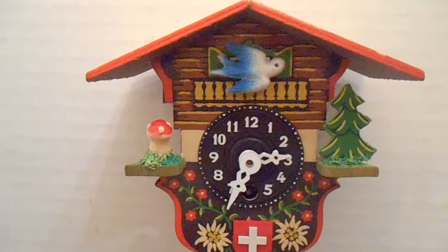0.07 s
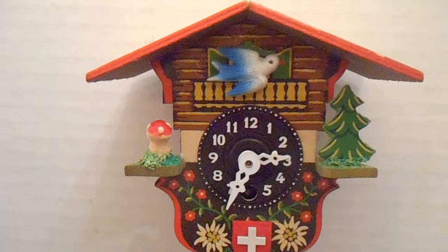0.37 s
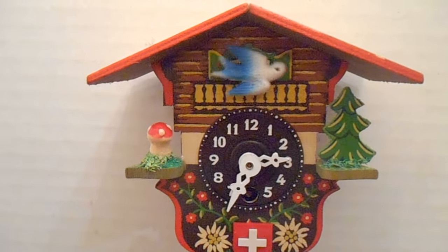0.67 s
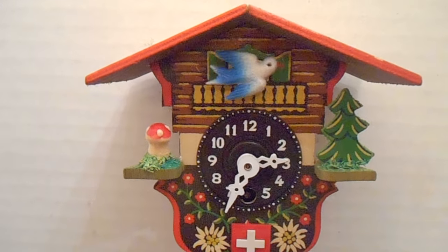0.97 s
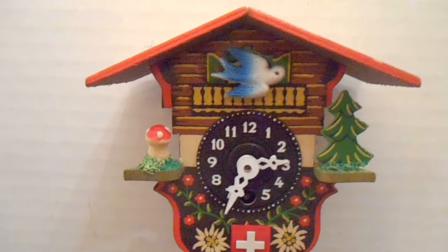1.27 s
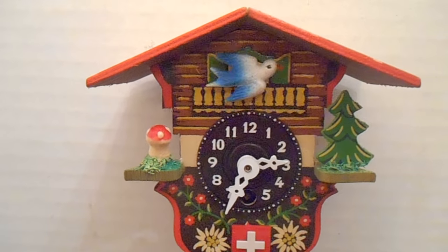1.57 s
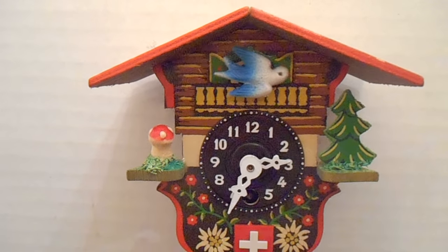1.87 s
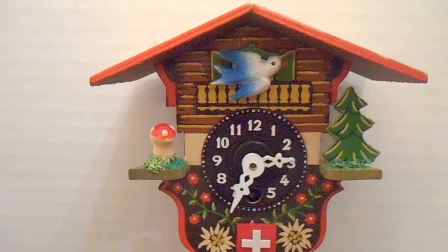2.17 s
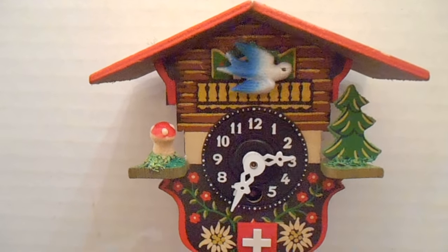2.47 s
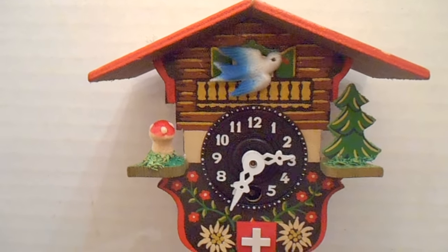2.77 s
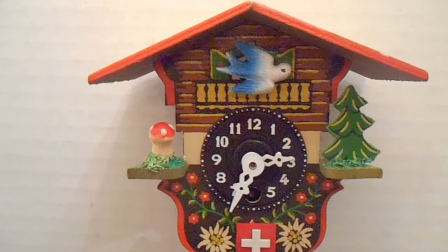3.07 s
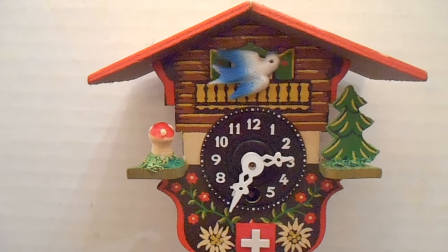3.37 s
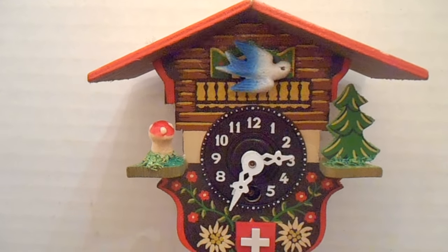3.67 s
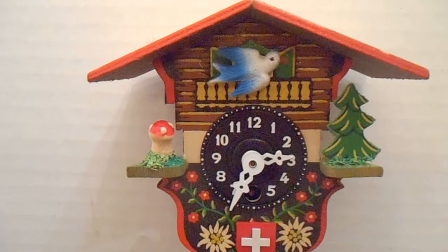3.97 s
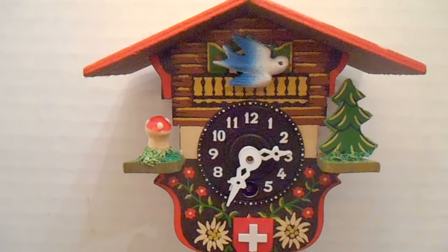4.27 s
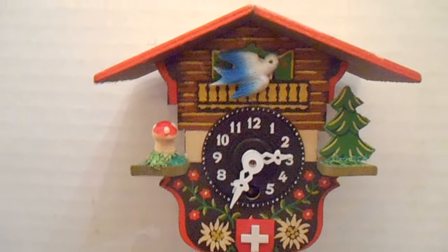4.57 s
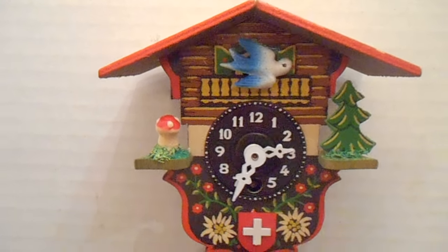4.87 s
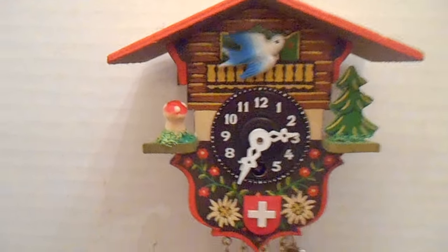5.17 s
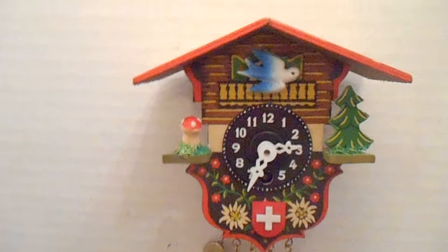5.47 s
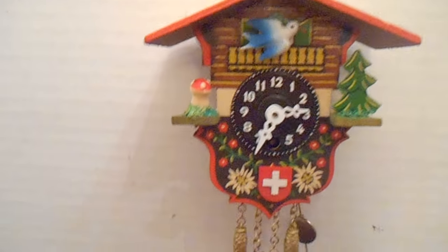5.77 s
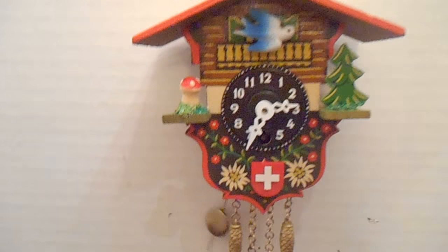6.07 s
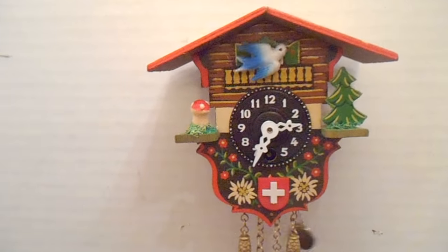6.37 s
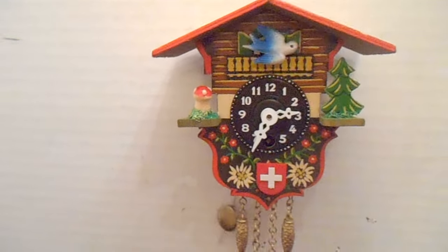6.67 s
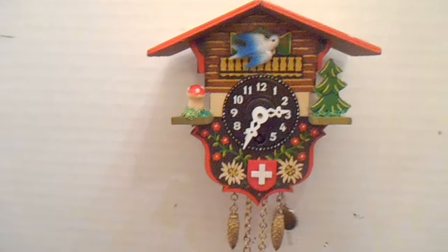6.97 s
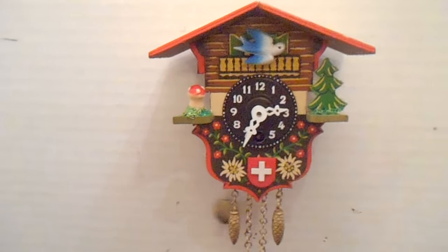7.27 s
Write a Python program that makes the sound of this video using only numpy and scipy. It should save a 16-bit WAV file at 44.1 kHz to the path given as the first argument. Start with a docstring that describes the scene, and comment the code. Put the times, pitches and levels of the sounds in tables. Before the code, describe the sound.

A miniature wooden wall clock ticks close to the microphone, about three and a half beats a second, in a slightly lopsided tick-tock. Each beat is a short, bright, metallic click with a little room reflection. A faint ventilation hum and hiss lie underneath. Past the middle, fingers shift on the hand-held camera, adding a few dry plastic clicks, then tiny creaks and soft rubs while the ticking carries on.

```python
"""Miniature cuckoo clock, close up

A small wooden clock ticks on the wall of a quiet room, over a murmur of ventilation. A tooth of the
escape wheel slides along one pallet and the wheel drops on the other: tick and tock ring the same brass
movement and case. Later, fingers shift on a hand-held camera, and its body clicks, creaks and rubs."""
import sys
import numpy as np
from scipy import signal
from scipy.fft import rfft, irfft, next_fast_len
from scipy.io import wavfile
from scipy.ndimage import uniform_filter1d

SR = 44100
rng = np.random.default_rng(int(sys.argv[2]) if len(sys.argv) > 2 else 0)


def generate_wav(signal):
    """Clip the signal to [-1, 1] and save it as 16-bit WAV at the path in sys.argv[1]."""
    frames = np.transpose(np.atleast_2d(signal))
    scaled = np.clip(frames, -1, 1) * 32767
    pcm = np.round(scaled).astype(np.int16)
    wavfile.write(sys.argv[1], SR, pcm)


N = 332073


def amp(db):
    """Decibels to gain."""
    return 10 ** (np.asarray(db) / 20)


def unit(x):
    """Scales to rms 1."""
    return x / np.sqrt(np.mean(x ** 2) + 1e-20)


def curve_at(points, hz):
    """Reads rows of (frequency, value) on a log-frequency axis."""
    freqs, values = np.transpose(points)
    return np.interp(np.log(hz + 1), np.log(freqs + 1), values)


def add(mix, start, sound):
    """Mixes a sound in at a start time in seconds."""
    part = mix[max(round(start * SR), 0):][:len(sound)]
    part += sound[:len(part)]


def noise(spectrum, size):
    """Noise of rms 1 with the given spectrum."""
    gain = amp(curve_at(spectrum, np.fft.rfftfreq(size, 1 / SR)))
    return unit(irfft(rfft(rng.standard_normal(size)) * gain, size))


def band(hz, width_hz, size):
    """Noise of rms 1 in one resonance."""
    offset = 2 * (np.fft.rfftfreq(size, 1 / SR) - hz) / width_hz
    return unit(irfft(rfft(rng.standard_normal(size)) / (1 + offset ** 2), size))


def ring(t, t60, rise):
    """Envelope of a struck part: it swells as the blow spreads, then dies away."""
    return (1 - np.exp(-(t / rise) ** 2)) * amp(-60 * t / t60)


# Tones in the ventilation's hum: (frequency [Hz], width [Hz], level [dB])
VENT_TONES = [(56.7, 0.92, -77.5), (176.7, 2.03, -70.5), (188, 3.06, -67.5), (241.2, 1.62, -67),
              (254.3, 5.4, -74), (287, 4.1, -81.5), (318, 5, -83), (353.5, 4.3, -80), (394, 3.97, -76.5),
              (617.4, 18.5, -70.5), (1164, 64.7, -69)]
def vent_drone(swell_db=1.8, fastest_swell_hz=3):
    """Ventilation hums: each tone wanders in phase, and all swell slowly together."""
    t = np.arange(N) / SR
    rates = np.geomspace(fastest_swell_hz / 10, fastest_swell_hz, 12)
    wobble = unit(sum(np.sin(2 * np.pi * (hz * t + rng.random())) for hz in rates))
    hum = np.zeros(N)
    for hz, width_hz, db in VENT_TONES:
        wander = np.cumsum(rng.standard_normal(N)) * np.sqrt(2 * np.pi * width_hz / SR)
        hum += amp(db) * np.sqrt(2) * np.sin(2 * np.pi * hz * t + wander)
    return unit(amp(swell_db * wobble)) * hum


# Airy hiss of the room: (frequency [Hz], relative level [dB])
AIR_SPECTRUM = [(180, -16), (300, -4), (440, -7.5), (620, -6), (760, -4), (1300, -2), (2000, -3.5),
                (2350, -7.5), (3200, -8.5), (4700, -14), (6200, -14.5), (10000, -20.5), (11800, -20.5),
                (12600, -41)]
# Low end of the ventilation: (frequency [Hz], relative level [dB])
RUMBLE_SPECTRUM = [(8, 1), (28, 2), (48, -14), (76, -1), (108, -13), (128, 3), (160, -7.5), (210, 2),
                   (280, -7.5), (400, -23), (700, -28)]
def room_tone(air_db=-53.87, rumble_db=-63):
    """A steady bed of ventilation rumble under an even hiss."""
    return amp(air_db) * noise(AIR_SPECTRUM, N) + amp(rumble_db) * noise(RUMBLE_SPECTRUM, N)


def tooth_slide(length_s=0.0042, swell_db=7):
    """The tooth scrapes over the pallet's face, gathering speed just before it falls."""
    size = round(length_s * SR)
    spectrum = [(1200, -16), (2300, 4), (3000, 14), (5200, 5), (7500, -17), (9200, -24), (12000, -12)]
    swell = amp(swell_db * np.linspace(-.5, .5, size))
    return noise(spectrum, size) * swell * signal.windows.tukey(size, .3)


# Drifting tone of the ticks:
# (frequency [Hz], swing [dB], swing phase [cycles], beat-to-beat scatter [dB])
TICK_COLOUR = [(2384, 0.35, 0.47, 1), (3020, 1.5, 0.43, 1.45), (3300, -1.5, 0.45, 0.5),
               (4010, 4.5, 0.6, 0.5), (5040, 2, 0.25, 1), (6470, 1.9, 0.75, 1.2), (9000, 1, 0.16, 0.5)]
def tick_colour(start, cycle_s=7.4):
    """One beat's EQ curve: the ticks' tone drifts slowly and varies a little from beat to beat."""
    hz, swing_db, phase, scatter_db = np.transpose(TICK_COLOUR)
    drift_db = swing_db * np.cos(2 * np.pi * (start / cycle_s - phase))
    return np.c_[hz, drift_db + scatter_db * rng.standard_normal(len(hz))]


# Modes of case and movement: (frequency [Hz], t60 [s], relative tick level [dB], relative tock level [dB])
CLOCK_MODES = [(623, 0.048, -50.5, -50.5), (980, 0.032, -43.5, -43.5), (1168, 0.088, -51, -44.5),
               (1386, 0.026, -40.5, -79), (1697, 0.035, -39, -54), (2018, 0.05, -56, -41.5),
               (2290, 0.036, -27.5, -31.5), (2400, 0.027, -27, -26), (3016, 0.065, -31, -36.5),
               (3307, 0.028, -35, -30.5), (3630, 0.036, -36, -39.5), (3940, 0.026, -32, -30.5),
               (4140, 0.021, -39, -32), (4320, 0.049, -42, -47), (4890, 0.037, -39, -31.5),
               (4977, 0.03, -32, -31), (5216, 0.032, -32.5, -34), (5680, 0.028, -32, -32),
               (5775, 0.03, -30.5, -35), (6265, 0.012, -28, -22.5), (6740, 0.014, -33, -40),
               (7000, 0.015, -40, -33), (7300, 0.018, -39.5, -32.5), (8685, 0.016, -27, -28),
               (9064, 0.014, -14.5, -16.5), (9390, 0.017, -25, -30), (9810, 0.0088, -22, -21),
               (11620, 0.0077, -27, -34)]
# Dense, quickly damped ring of the small parts: (frequency [Hz], relative level [dB])
CLATTER_SPECTRUM = [(300, -33), (1000, -24.5), (2000, -1), (2700, -13.5), (3400, 4.5), (4000, -5.5),
                    (4600, 3), (6500, 3.5), (8200, 1.5), (9300, -9), (10400, 1), (11200, -2.5), (12200, 2)]
def tooth_drop(pallet, colour, rise_cycles=2.4, detune=0.0037, phase_scatter=0.55, noise_rise_s=0.00021):
    """A tooth hits pallet 0 or 1: the metal answers first, the wood later, and loose parts rattle on."""
    t = np.arange(SR // 6) / SR
    hz, t60, tick_db, tock_db = np.transpose(CLOCK_MODES)[:, :, None]
    gain = amp((tick_db, tock_db)[pallet] + curve_at(colour, hz))
    slip, drift = rng.standard_normal((2, len(hz), 1))  # no two teeth land on quite the same spot
    waves = np.sin(2 * np.pi * hz * (1 + detune * drift) * t + phase_scatter * slip)
    polarity = (-1) ** np.arange(len(hz))[:, None]  # neighbouring modes push the air in opposite senses
    tones = (polarity * gain * ring(t, t60, rise_cycles / hz) * waves).sum(0)
    clatter = amp(-26) * ring(t, t60=0.023, rise=noise_rise_s)
    rattle = amp(-46) * ring(t, t60=0.18, rise=noise_rise_s)
    return tones + (clatter + rattle) * noise(CLATTER_SPECTRUM, len(t))


def rebound(strike, bounce_db=-14, delay_range_s=(0.0015, 0.003)):
    """The wheel recoils and touches the pallet once more, after a slightly different gap each time."""
    delay = round(rng.uniform(*delay_range_s) * SR)
    return strike + amp(bounce_db) * np.r_[np.zeros(delay), strike][:len(strike)]


# Beats of the escapement, tick and tock in turn: (time [s], accent [dB])
BEAT_CUES = [(0.1598, 2), (0.4276, 0), (0.7413, 2.1), (1.0109, -1), (1.3267, 3), (1.5952, 1.5),
             (1.9099, 1.5), (2.1831, -0.5), (2.4944, 1.5), (2.7618, -0.5), (3.0838, 1), (3.3588, -0.4),
             (3.6702, 0.5), (3.9419, -0.5), (4.2578, 1), (4.5342, 0.2), (4.8442, 0), (5.1136, -0.6),
             (5.4315, 0), (5.7046, -1.5), (6.0185, -0.4), (6.2832, -0.5), (6.6034, 1), (6.8707, -1.8),
             (7.1871, -0.3), (7.4528, -2.5)]
def escapement(tick_gain_db=1.6, tock_gain_db=1.25, slide_db=-49, slide_spread_db=5):
    """Each swing of the pendulum frees a tooth: a tiny scrape runs straight into the drop."""
    out = np.zeros(N)
    for k, (start, accent_db) in enumerate(BEAT_CUES):
        pallet = k % 2
        scrape = amp(slide_db + slide_spread_db * rng.uniform(-0.89, 1)) * tooth_slide()
        add(out, start - len(scrape) / SR, scrape)
        strike = rebound(tooth_drop(pallet, tick_colour(start)))
        add(out, start, amp(accent_db + (tick_gain_db, tock_gain_db)[pallet]) * strike)
    return out


# The room's reverb tail: (frequency [Hz], level [dB], t60 [s])
REVERB_BANDS = [(500, 3, 0.11), (1220, -4, 0.089), (2330, -19, 0.43), (2950, -20.5, 0.28),
                (3470, -14.5, 0.41), (4300, -25, 0.25), (5440, -12.5, 0.2), (6340, -23.5, 0.31),
                (7600, -24, 0.19), (9000, -27, 0.2), (10500, -28, 0.16)]
def room_reverb(source, predelay_s=0.007, tails=3, sway_hz=0.25):
    """Diffuse reflections, crossfading between several tails as the camera sways."""
    bands, out = np.array(REVERB_BANDS), np.zeros(N)
    for k in range(tails):
        hz, t, spectra = signal.stft(rng.standard_normal(SR // 2), SR, nperseg=256)
        level_db = curve_at(bands[:, [0, 1]], hz)[:, None]
        t60 = curve_at(bands[:, [0, 2]], hz)[:, None]
        energy_trim = np.sqrt(2 * np.log(1000) / (t60 * SR))  # a longer decay adds no energy
        spectra = spectra * amp(level_db - 60 * t / t60) * energy_trim
        tail = np.r_[np.zeros(round(predelay_s * SR)), signal.istft(spectra, SR, nperseg=256)[1]]
        send = np.cos(2 * np.pi * sway_hz * np.arange(N) / SR + np.pi * k / tails) * np.sqrt(2 / tails)
        out += signal.fftconvolve(source * send, tail)[:N]
    return out


# Clicks of the camera's body: (time [s], ring level [dB], ring pitch [Hz], snap level [dB])
CLICK_CUES = [(4.6120, -34, 5100, -41), (4.6168, -32, 845, -38), (4.6329, -28.5, 765, -39),
              (5.822, -50, 7000, -39.5), (6.0138, -29, 7300, -37), (6.5751, -28, 3080, -32.5),
              (6.576, -15, 4800, -36), (6.9366, -32, 6800, -44), (6.9680, -27, 3900, -44),
              (7.098, -39, 5970, -40)]
def body_clicks(t60_at_1khz=0.0098, damping=0.53, rise_cycles=0.25, snap_t60=0.0098):
    """Plastic clicks under the fingers: a dry snap and one ring, shorter the higher its pitch."""
    out, t = np.zeros(N), np.arange(SR // 20) / SR
    snap_spectrum = [(400, -11), (2000, 3), (6000, 3), (12000, -4), (15000, -15)]
    for start, ring_db, hz, snap_db in CLICK_CUES:
        t60 = t60_at_1khz * (1000 / hz) ** damping
        body = amp(ring_db) * ring(t, t60, rise_cycles / hz) * np.sin(2 * np.pi * hz * t)
        snap = amp(snap_db - 60 * t / snap_t60) * noise(snap_spectrum, len(t))
        add(out, start, body + snap)
    return out


# Thin, bright creak of plastic: (frequency [Hz], relative level [dB])
CREAK_SPECTRUM = [(400, -15), (2500, -2), (7000, 5), (12000, -3), (15000, -15)]
def grip_creaks(from_s=5.3, until_s=7.15, per_second=5, level_db=-44, t60=0.007):
    """The plastic gives faint snaps at chance moments while the hand shifts its grip."""
    out, t = np.zeros(N), np.arange(SR // 40) / SR
    for start in rng.uniform(from_s, until_s, round(per_second * (until_s - from_s))):
        add(out, start, amp(level_db - 60 * t / t60) * noise(CREAK_SPECTRUM, len(t)))
    return out


# Brief hisses from the camera's body: (time [s], length [s], level [dB], centre [Hz])
HISS_CUES = [(6.213, .045, -55, 8400), (6.347, 0.097, -53, 7050), (6.451, 0.099, -54, 7150),
             (6.634, 0.11, -55.5, 7700), (6.906, 0.049, -54.5, 7500), (6.967, .025, -51.5, 3940),
             (7.092, 0.046, -55.5, 3900), (7.22, 0.41, -59, 5500)]
def handling_hisses(grain_db=2.0, relative_width=0.86):
    """Soft, grainy handling hisses: finger rubs and the short tails of two clicks."""
    out = np.zeros(N)
    for start, length, db, hz in HISS_CUES:
        size = round(length * SR)
        grain = unit(uniform_filter1d(rng.standard_normal(size), size=50))
        hiss = unit(amp(grain_db * grain) * band(hz, relative_width * hz, size))
        add(out, start, amp(db) * hiss * signal.windows.tukey(size, .6))
    return out


def scene():
    """Mono mix: the clock and its reverb, dry handling noise and the ventilated room's bed."""
    ticking = escapement()
    clock = ticking + room_reverb(ticking)
    handling = body_clicks() + handling_hisses()
    bed = vent_drone() + room_tone()
    return (clock + handling + bed + grip_creaks())[None]


# Response of the small microphone: (frequency [Hz], gain [dB])
MIC_RESPONSE = [(10, -1.5), (9900, -0.5), (10400, -4.5), (10950, -16), (12150, -21), (12700, -47),
                (13400, -57)]
def record(dry, cutoff_hz=13500):
    """The small microphone rolls off the top end, and a steep low-pass cuts what is left above it."""
    size = next_fast_len(N + 4096)
    response = amp(curve_at(MIC_RESPONSE, np.fft.rfftfreq(size, 1 / SR)))
    coloured = irfft(rfft(dry, size) * response, size)[:, :N]
    lowpass = signal.firwin(511, cutoff_hz, window=("kaiser", 9), fs=SR)
    return signal.oaconvolve(coloured, lowpass[None], "same")


dry = scene()
out = record(dry)
generate_wav(out)
```